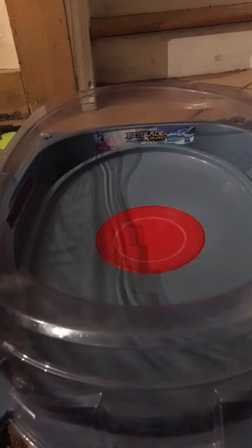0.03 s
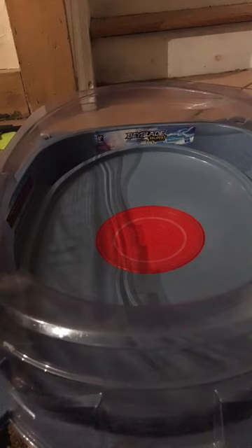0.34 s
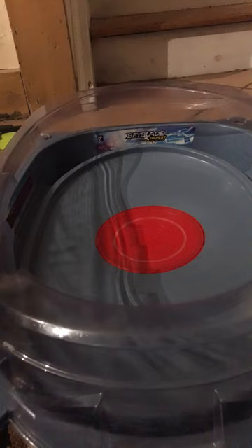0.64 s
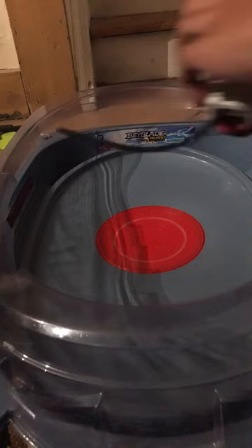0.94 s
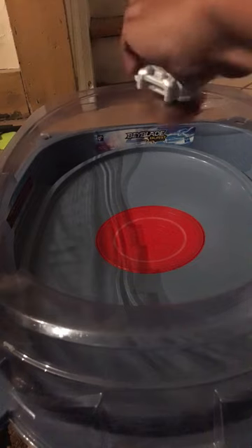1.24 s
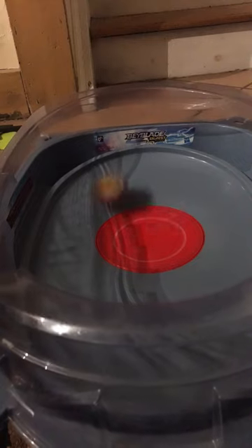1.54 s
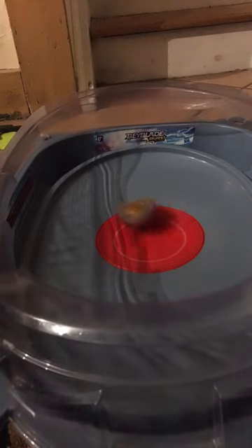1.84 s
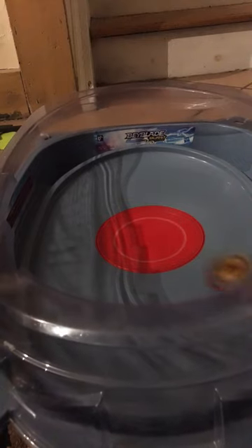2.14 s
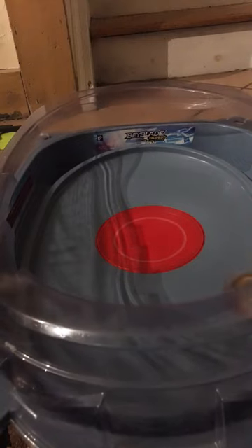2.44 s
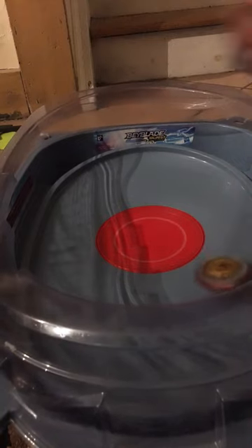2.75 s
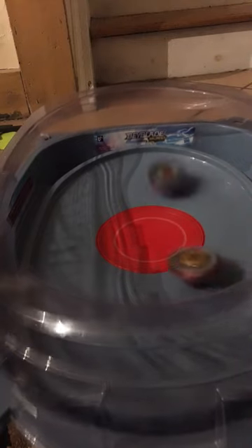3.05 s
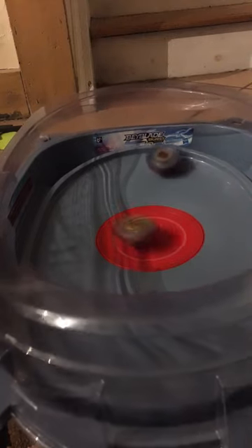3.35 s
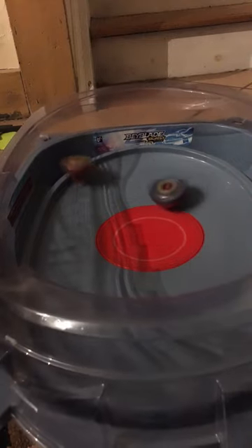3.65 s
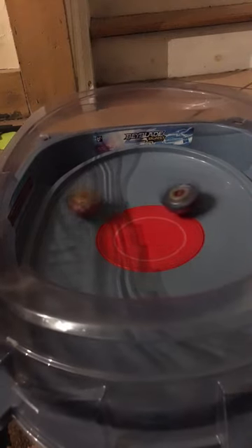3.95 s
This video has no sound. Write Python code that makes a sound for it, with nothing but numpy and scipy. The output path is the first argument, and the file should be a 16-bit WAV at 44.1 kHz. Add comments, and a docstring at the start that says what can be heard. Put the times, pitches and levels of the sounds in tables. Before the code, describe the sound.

Spinning tops are launched by ripcord, then clatter and whir around a plastic bowl.

```python
"""Spinning tops in a toy stadium

Two tops are launched by ripcord into a plastic stadium in a small room. Each toothed cord drives its
launcher with a train of impulses. The top drops, bounces and knocks against the wall and the other top,
exciting the modes of the shell, while friction at its spinning tip keeps the bowl ringing.
A steady fan-like whirr and a low hum lie behind it."""
import sys
import numpy as np
from scipy import signal
from scipy.fft import rfft, irfft
from scipy.io import wavfile
from scipy.ndimage import uniform_filter1d

SR = 44100
rng = np.random.default_rng(int(sys.argv[2]) if len(sys.argv) > 2 else 0)


def wrap_up_sound(samples):
    """Save the sound to the file named by the first command line argument, as 16-bit audio."""
    columns = np.atleast_2d(samples).T
    # keep every value between -1 and 1, then stretch to whole-number steps
    tamed = np.clip(columns, -1, 1)
    steps = np.round(tamed * 32767).astype(np.int16)
    wavfile.write(sys.argv[1], SR, steps)


N = 176400
T = np.arange(N) / SR
HZ = np.arange(N + 1) * SR / (2 * N) + 1e-3


def undb(db):
    """Amplitude ratio of a level in decibels."""
    return 10 ** (np.asarray(db) / 20)


def unit(x):
    """Normalisation to rms 1."""
    return x / np.sqrt(np.mean(x ** 2))


def curve(table, column=1):
    """Linear interpolation of a table column over time."""
    return np.interp(T, np.array(table)[:, 0], np.array(table)[:, column])


def colour(x, outline):
    """Minimum-phase filter with an outline (f/Hz, level/dB); it conserves the power of white noise."""
    f, db = np.array(outline, float).T
    bass_loss_db = 31 * np.maximum(np.log2(f[0] / HZ), 0)
    gain = unit(undb(np.interp(np.log(HZ), np.log(f), db) - bass_loss_db))
    cepstrum = irfft(np.log(gain + 1e-6))
    cepstrum[1:N] *= 2
    cepstrum[N + 1:] = 0
    return irfft(rfft(x, 2 * N) * np.exp(rfft(cepstrum)))[:N]


def resonate(x, peaks):
    """Forced response, at rms 1, of parallel resonators (f/Hz, bandwidth/Hz, level/dB)."""
    response = sum((-1) ** k * undb(db) / (1 + 1j * (HZ - f * f / HZ) / width)
                   for k, (f, width, db) in enumerate(peaks))
    return unit(irfft(rfft(x, 2 * N) * response)[:N])


def fade(t, t60):
    """Exponential decay by 60 dB in t60 seconds."""
    return np.exp(-np.log(1000) * t / t60)


def drift(rate_hz):
    """Piecewise linear random fluctuation with a spread near 1."""
    return np.interp(T * rate_hz, np.arange(1000), rng.standard_normal(1000))


def add(out, at_s, sound):
    """Superposition of a sound from a given time on."""
    i = int(at_s * SR)
    out[i:i + len(sound)] += sound[:N - i]


def excite(x, response):
    """Convolution with an impulse response scaled to unit energy."""
    return signal.fftconvolve(x, response / np.sqrt(np.sum(response ** 2)))[:N]


def whirr():
    """Filtered noise: a broad fan-like rush and narrow resonances that flutter in level."""
    # spectrum of the rush: f/Hz, level/dB
    spectrum = [(35, -16.5), (60, -18.5), (76, -10.5), (123, -9.5), (210, -17.5), (285, -15.5), (320, -10),
                (376, -28.5), (403, -8), (475, -8), (521, -1.5), (585, -4), (688, -2.5), (810, -13.5),
                (869, -2), (953, -14.5), (1020, -6.5), (1200, -6.5), (1450, -8.5), (1670, -10.5),
                (2250, -10), (2530, -7.5), (4740, -33.5), (7200, -34.5), (15500, -50.5)]
    # resonances: f/Hz, bandwidth/Hz, level/dB
    peaks = [(212, 23, -8), (410, 13, -2), (546, 53, -14.5), (612, 38, -1.5), (678, 18, 2.5),
             (1180.5, 13.7, 3), (1197, 22, 6), (1279, 29, 1), (1542, 24, -1.5), (1694, 13, 0.5),
             (2560, 36, -27)]
    # envelopes: t/s, relative rush level/dB, resonance level/dB
    levels = [(0, -2, -40), (.35, -1.5, -38), (.7, 0.5, -39), (.95, -1.5, -41), (1.15, 0, -42.5),
              (1.6, -2, -52), (2.7, -3.5, -53.5), (4, -2.5, -46)]
    rush = colour(rng.standard_normal(N), spectrum) * undb(-36 + curve(levels) + .5 * drift(11))
    tones = resonate(rng.standard_normal(N), peaks) * undb(curve(levels, column=2) + 2.5 * drift(45))
    return rush + tones


def hum(hz=54.3, level_db=-49.5, waver_db=3):
    """A low sinusoid wavers by random frequency and amplitude modulation."""
    cycles = np.cumsum(hz * (1 + .014 * drift(6.5))) / SR
    return unit(np.sin(2 * np.pi * cycles)) * undb(level_db + waver_db * drift(6.76))


def ripcords():
    """Impulse-train excitation: cord teeth rattle the case in a soft run-up, a snap and a hard burst."""
    # pulls: first tooth t/s, hard pull t/s, cord free t/s, run-up level/dB, pull level/dB, top tooth f/Hz
    pulls = [(1.165, 1.2545, 1.283, -29.5, -12, 700), (2.83, 2.9295, 2.968, -25, -9.5, 620)]
    # spectrum of the launcher, one per pull: f/Hz, level/dB
    launchers = [
        [(700, -27), (1450, -1.5), (2100, 1.5), (2600, 4.5), (3300, -1), (4300, 5), (5300, -2.5), (6700, -4.5),
         (7500, -9.5), (8700, 1), (9800, -1.5), (11000, -3), (15500, -18)],
        [(700, -28), (1500, -4.5), (2100, 1.5), (2550, 11.5), (3100, 6), (3500, 0.5), (4500, 4), (5800, -3.5),
         (7700, -5), (9000, 3.5), (10000, 2), (11000, -4.5), (15500, -4.5)],
    ]
    case_t60_s, coast_t60_s = .014, .026  # rattle after each tooth; the gear running out
    scatter_db, run_up_rise_db, swell_db, snap_db = 1.5, 9.5, 3.5, -18
    out, t = 0, T[:SR // 10]
    for (first, hard, free, run_db, pull_db, top_hz), spectrum in zip(pulls, launchers):
        tooth_hz = top_hz * np.interp(T, [first, hard, free], [.6, .9, 1]) * (1 + .12 * drift(200))
        teeth_passed = np.floor(np.cumsum(np.abs(tooth_hz)) / SR)
        impulses = np.diff(teeth_passed, prepend=0) * undb(scatter_db * rng.standard_normal(N))
        rattle = unit(excite(impulses, fade(t, case_t60_s)) * rng.standard_normal(N))
        run_up_left = np.clip((hard - T) / (hard - first), 0, 1)
        off_middle = np.minimum(np.abs(1 - 2 * (T - hard) / (free - hard)), 1)
        db = np.where(T < hard, run_db - run_up_rise_db * run_up_left ** .89,
                      pull_db - swell_db * off_middle)
        onset = np.clip((T - first) / .041, 0, 1)
        drive = rattle * undb(db) * onset * fade(np.maximum(T - free, 0), coast_t60_s)
        add(drive, hard, undb(snap_db) * rng.standard_normal(len(t)) * fade(t, t60=.018))
        out = out + colour(drive, spectrum) + wheel(drive)
    return undb(-.5) * room(out, wet_db=-6)


def wheel(drive, coupling_db=-10):
    """Sympathetic vibration: a top's metal wheel rings at its natural frequencies."""
    # modes of the wheel: f/Hz, level/dB, t60/s
    modes = [(2535, 0, .3), (2740, -6, .2), (3020, -5, .2), (4170, -8, .15), (4586, -6, .2),
             (9015, -13, .12)]
    t = T[:SR]
    response = sum(undb(db) * np.sin(2 * np.pi * f * t) * fade(t, t60) for f, db, t60 in modes)
    return undb(coupling_db) * excite(drive, response)


def room(x, wet_db, t60=.3, build_up_s=.0082):
    """Reverberation: a diffuse field builds up behind the direct sound and decays exponentially."""
    t = T[:SR]
    tail = rng.standard_normal(SR) * fade(t, t60) * (1 - np.exp(-(t / build_up_s) ** 2))
    return x + undb(wet_db) * excite(x, tail)


def knocks():
    """Impact excitation: a top sets off the shell's thud, clack and tick, a floor note and a deep boom."""
    # impacts: t/s, boom level/dB, thud level/dB, note level/dB, note f/Hz, clack level/dB, tick level/dB
    impacts = [(1.391, -25, -22, -1, 562, -11.5, -16.5), (1.566, -39, -33, -17, 620, -40, -47),
               (1.674, -46, -33.5, -28, 660, -50, -44.5), (1.794, -27.5, -25.5, -17.5, 560, -29, -38.5),
               (1.860, -46, -32, -30, 591, -18.5, -30), (1.902, -54, -33, -17, 564, -25.5, -49),
               (2.05, -52, -34, -26, 630, -27, -38.5), (2.126, -44, -30, -15.5, 583, -35, -63),
               (2.2509, -31, -19.5, -6.5, 574, -21.5, -30.5), (2.4, -38, -31, -27.5, 686, -40, -62),
               (2.503, -52, -29.5, -20.5, 683, -31.5, -67), (2.602, -49, -34.5, -22, 670, -42, -60),
               (3.0746, -20.5, -22.5, -3.5, 578.6, -18, -27), (3.083, -23.5, -24, -5, 537, -34, -31),
               (3.269, -43, -34, -19, 622, -29, -41.5), (3.3024, -19.5, -23, -5.5, 674, -14.5, -20.5),
               (3.567, -33, -33, -24.5, 596, -31, -45), (3.6453, -45, -30, -37, 623, -29, -33),
               (3.658, -43, -20, -4, 717, -13, -26), (3.674, -53, -34, -40, 730, -34, -39),
               (3.742, -30.5, -33.5, -25, 620, -45, -57), (3.808, -43, -32.5, -51, 635, -45, -43.5),
               (3.905, -43, -36.5, -30, 691, -50, -43)]
    # bending modes of the floor: ratio to the note, level/dB, t60/s
    floor_modes = [(.68, -13, .06), (.92, -6, .11), (1.07, 0, .06), (1.45, -14, .04)]
    # the whole stadium bouncing on its base: f/Hz, level/dB, t60/s
    boom_modes = [(59, -4.5, 0.37), (79, 1.5, 0.12), (113.5, -2.5, 0.13), (138, -0.5, 0.23)]
    # spectra of the shell's dense low, middle and high modes: f/Hz, level/dB
    thud_spectrum = [(35, -17), (60, -15), (100, -5.5), (150, -5), (260, -4.5), (420, -5.5), (700, -19),
                     (1500, -43)]
    clack_spectrum = [(300, -38.5), (600, 12.5), (850, 3.5), (1200, 2.5), (1600, 0), (2100, -1.5),
                      (2900, -1), (3600, -16.5), (4100, -16), (5000, -26), (9000, -53.5)]
    tick_spectrum = [(1800, -12), (3200, 3.5), (4200, 4.5), (5000, -2.5), (6000, -2), (7500, -4.5),
                     (9500, -4), (12000, -9.5), (15500, -18)]
    thud, tones, clack, tick = np.zeros((4, N))
    for at, boom_db, thud_db, note_db, note_hz, clack_db, tick_db in impacts:
        add(thud, at, undb(thud_db) * burst(rise_s=.0021, t60=.18))
        add(clack, at, undb(clack_db) * burst(rise_s=.0017, t60=.15))
        add(tick, at, undb(tick_db) * burst(rise_s=.0013, t60=.11))
        note_modes = [(note_hz * ratio, db, t60) for ratio, db, t60 in floor_modes]
        add(tones, at, undb(note_db) * ring(note_modes, rise_s=.002))
        add(tones, at, undb(boom_db) * ring(boom_modes, rise_s=.0021))
    shell = colour(thud, thud_spectrum) + colour(clack, clack_spectrum) + colour(tick, tick_spectrum)
    return room(shell + wheel(tick), wet_db=-4) + room(tones, wet_db=-15.5)


def burst(rise_s, t60):
    """Modal overlap: many close modes, struck together, merge into decaying noise."""
    t = T[:SR // 2]
    return rng.standard_normal(len(t)) * (1 - np.exp(-t / rise_s)) * fade(t, t60)


def ring(modes, rise_s, glide=.19, glide_s=.0043):
    """Dispersion: short bending waves arrive first, so struck modes start sharp and settle."""
    t = T[:SR // 2]
    warped_t = t + glide * glide_s * (1 - np.exp(-t / glide_s))
    sound = 0
    for f, db, t60 in modes:
        hz = f * (1 + .012 * rng.standard_normal())  # a little different on each blow
        sound += undb(db) * np.sin(2 * np.pi * (hz * warped_t + rng.random())) * fade(t, t60)
    return sound * (1 - np.exp(-t / rise_s))


def rolling():
    """Friction noise: the tips catch on the plastic in tiny grains, harder once a turn, ringing the bowl."""
    # scraping of the tips: t/s, level/dB, relative grit level/dB
    levels = [(1.42, -46, -24), (1.6, -36, -19), (1.78, -33, -24), (1.9, -30.5, -18), (1.95, -33.5, -19),
              (1.99, -25, -11.5), (2.06, -28.5, -22), (2.15, -36.5, -22), (2.5, -37, -25.5),
              (2.85, -35, -19), (3.15, -38, -22), (3.45, -32.5, -12.5), (3.55, -32, -19.5),
              (3.74, -35.5, -25), (3.87, -38, -18), (4.0, -33, -18.5)]
    # stadium resonances under the tips: f/Hz, bandwidth/Hz, level/dB
    bowl_peaks = [(102, 33, -5), (219, 47, -5), (417, 180, -5.5), (559, 150, 2), (674, 100, 2.5),
                  (930, 27, -0.5), (1397, 48, 0), (1517, 70, 2), (1660, 60, 1), (2570, 73, -10.5),
                  (2966, 103, -7), (3880, 69, -17.5)]
    # spectrum of the bright grit: f/Hz, level/dB
    grit_spectrum = [(2500, -15.5), (3700, 7), (4120, 16), (4500, 0.5), (6200, 4), (9000, 0), (15500, -23)]
    spin_hz, spin_depth, grains_per_s, scatter_db = 77.9, .3, 1800, 2.5
    turns = np.cumsum(spin_hz * (1 + .0785 * drift(6.5))) / SR
    catches = rng.random(N) < grains_per_s / SR
    grains = catches * rng.standard_normal(N) * undb(scatter_db * rng.standard_normal(N))
    grains *= (1 + spin_depth * np.sin(2 * np.pi * turns)) * undb(2.56 * drift(34.99))
    bowl = resonate(grains, bowl_peaks)
    grit = undb(curve(levels, column=2)) * unit(colour(room(grains, wet_db=2.5), grit_spectrum))
    return (bowl + grit) * undb(curve(levels)) * (T > levels[0][0])


def compress(x, threshold_db=-17, ratio=1.6, release_s=.1):
    """Dynamic compression: the gain falls on loud bursts and recovers slowly."""
    power = np.maximum(uniform_filter1d(x ** 2, size=256), 1e-12)
    release = T / release_s
    held_rms = np.exp(np.maximum.accumulate(np.log(power) / 2 + release, axis=-1) - release)
    return x * np.minimum(undb(threshold_db) / held_rms, 1) ** (1 - 1 / ratio)


def scene():
    """Superposition of launches, knocks and rolling on the whirr and hum, in one channel."""
    return (ripcords() + knocks() + rolling() + whirr() + hum())[None]


def record(dry, low_cut_hz=27.4, high_cut_hz=15800, start_s=.066):
    """Band limiting, compression and soft saturation in a microphone that opens after a moment."""
    bass_cut = signal.sosfilt(signal.butter(3, low_cut_hz, "high", fs=SR, output="sos"), dry)
    saturated = .9 * np.tanh(compress(bass_cut) / .9)
    opening = np.clip((T - start_s) / .003, .005, 1)
    return signal.sosfilt(signal.ellip(10, .2, 80, high_cut_hz, fs=SR, output="sos"), saturated * opening)


dry = scene()
out = record(dry)
wrap_up_sound(out)
```